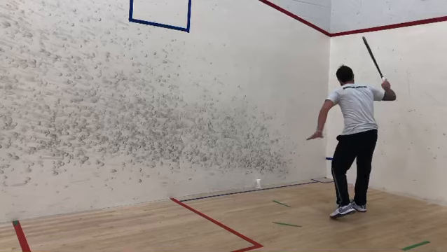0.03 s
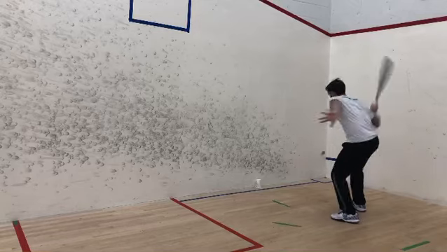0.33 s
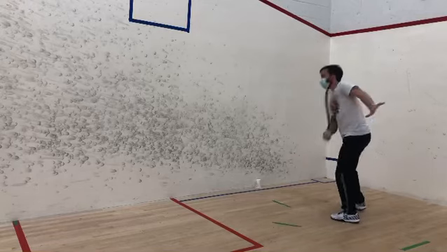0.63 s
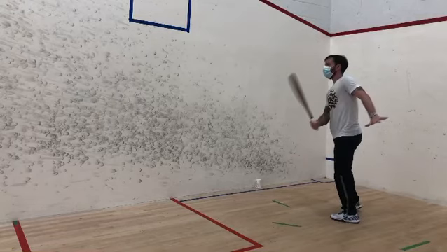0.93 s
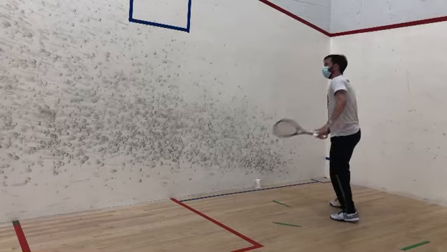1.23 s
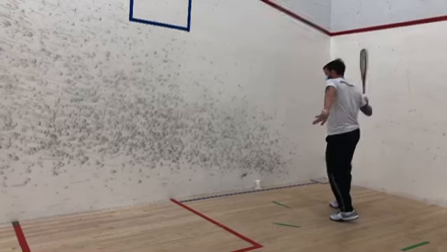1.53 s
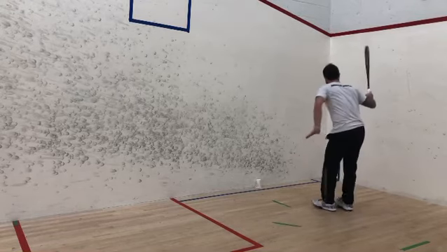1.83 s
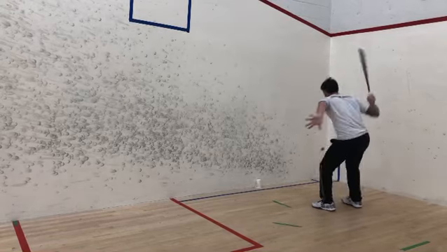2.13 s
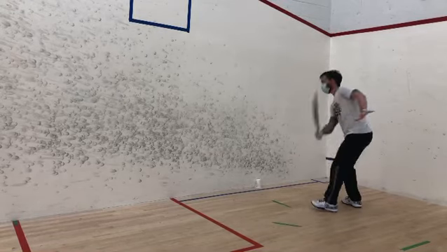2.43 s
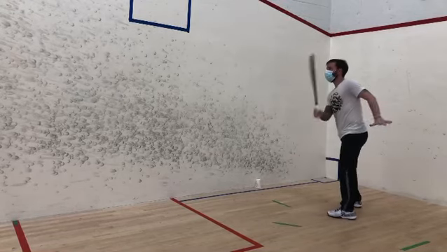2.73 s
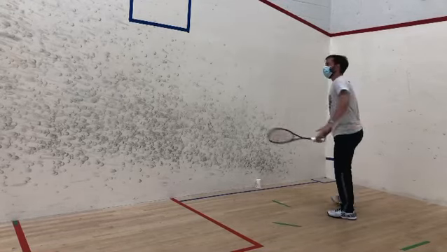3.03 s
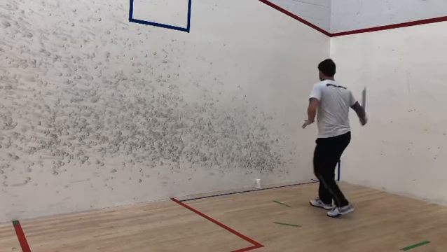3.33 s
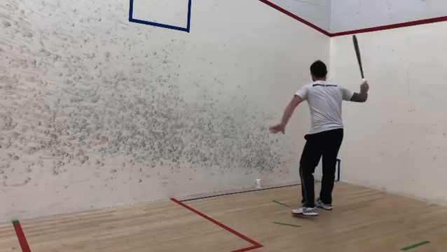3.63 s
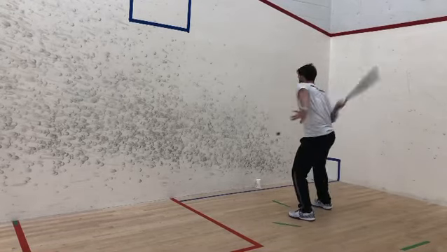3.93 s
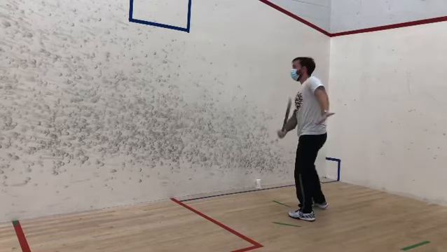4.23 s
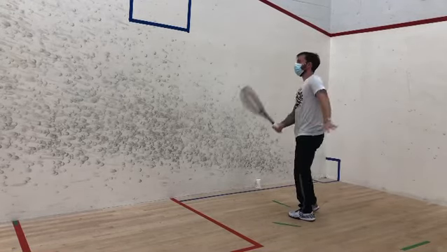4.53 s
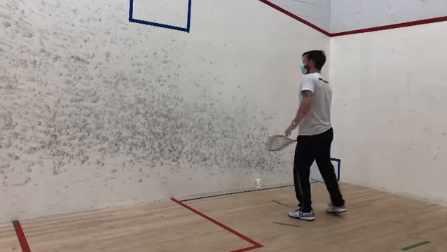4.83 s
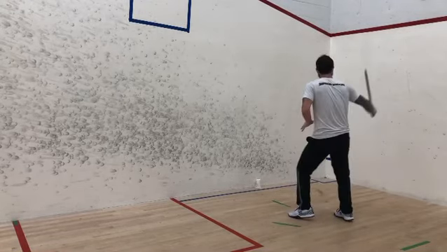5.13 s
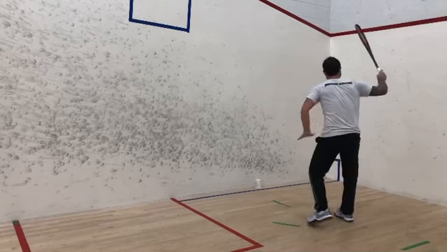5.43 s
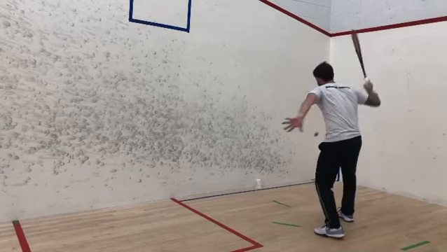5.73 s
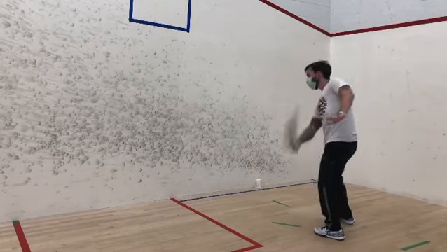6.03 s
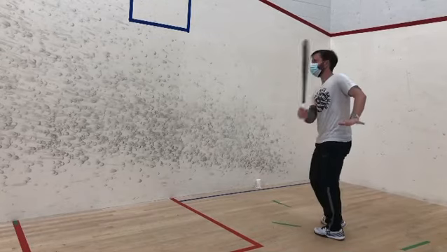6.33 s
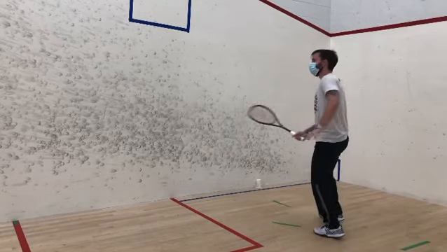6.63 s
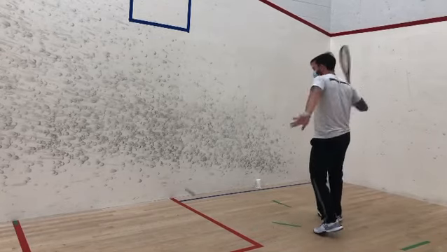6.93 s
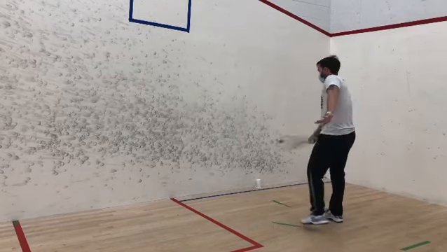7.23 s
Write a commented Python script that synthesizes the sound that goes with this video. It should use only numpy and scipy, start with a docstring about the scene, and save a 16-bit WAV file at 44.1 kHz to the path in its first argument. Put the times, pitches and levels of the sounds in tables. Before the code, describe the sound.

A lone player hits a squash ball five times at an even pace in a bare, reverberant court. Each stroke is a faint swish and a sharp, pinging crack. After the first four, the ball slaps the front wall loudly, then bounces softly on the wooden floor with a low boom. Light shoe scuffs fall between strokes over a ventilation murmur. The microphone picks up direct hits and long echoes.

```python
"""A shoe scuff and the last of a slap die away over murmuring ventilation in a bare, reverberant court.
Then a player strikes a squash ball five times: the racket swishes, its strings crack and ping. After each
of the first four strokes the hollow ball slaps the front wall loudly and bounces softly on the sprung
floor, which booms. Shoes scuff between strokes. Each impact of the ball is heard as direct sound, early
reflections and a diffuse field whose treble decays first."""
import sys
import numpy as np
from scipy import signal
from scipy.fft import rfft, irfft, next_fast_len
from scipy.io import wavfile
from scipy.ndimage import uniform_filter1d, minimum_filter1d

SR = 44100
rng = np.random.default_rng(int(sys.argv[2]) if len(sys.argv) > 2 else 0)


def generate_wav(signal):
    """Clip the signal to [-1, 1] and save it as 16-bit WAV at the path in sys.argv[1]."""
    frames = np.transpose(np.atleast_2d(signal))
    scaled = np.clip(frames, -1, 1) * 32767
    pcm = np.round(scaled).astype(np.int16)
    wavfile.write(sys.argv[1], SR, pcm)


N = 325458

# racket meets ball: (time [s], crack level [dB], ping level [dB], string bed mode [Hz], upper mode [Hz])
STROKES = [(0.3916, -8, -6, 1080, 1460), (2.2296, -8.5, -1, 1020, 1660), (3.9742, -12.5, 0, 1020, 1530),
           (5.8642, -10.5, -6, 1040, 1560), (7.1638, -10, 0, 980, 1750)]
# ball meets wall, the first before the scene opens: (time [s], level [dB], snap spacing [s])
SLAPS = [(-1.2, 2, .0013), (0.6129, 2.4, .0012), (2.4530, 2, .0014), (4.1948, 1.7, .0011),
         (6.0733, 2, .0014)]
# ball meets floor: (time [s], tick level [dB])
BOUNCES = [(1.391, -29.5), (3.3644, -31), (5.0675, -34), (6.8777, -32)]
# shoes on the boards: (time [s], scuff level [dB], scuff length [s], thud level [dB])
STEPS = [(-.07, -44, .03, -46), (1.724, -44.5, .03, -42), (1.775, -47.5, .006, -44),
         (1.842, -51, .008, -45), (3.4554, -46, .006, -39), (4.757, -51, .06, -62), (5.122, -55, .008, -41),
         (5.2458, -47, .006, -47)]
# normal modes: (frequency [Hz], relative level [dB], decay time T60 [s])
HARD_BALL_MODES = [(430, -11, .014), (810, -5, .016), (1850, -3, .006), (3100, -8, .0025),
                   (7300, -7, .0013)]   # the hollow rubber ball, driven hard
SOFT_BALL_MODES = [(760, 13, .02), (3100, 12, .008)]   # the same ball, gently bounced
BOARD_MODES = [(80, -1, .13), (115, 6, .14), (148, -5, .8), (200, 5, .14)]   # the sprung floor
# reverberation time of the court: (frequency [Hz], T60 [s])
COURT_T60 = [(100, 2.2), (260, 2.8), (700, 2.8), (1900, 2.6), (3000, 2.05), (4800, 1.36), (7000, .9),
             (9500, .66), (13000, .5)]
# spectra that the sources radiate into the court: (frequency [Hz], relative spectral density [dB])
VENT_SPECTRUM = [(20, -40), (30, -16), (44, 4), (54, -4), (80, 4), (115, -5), (170, -2), (293, -7),
                 (373, -4), (450, -11), (624, -11), (775, -6), (1200, -16), (2000, -18), (4400, -36),
                 (11600, -53), (16000, -65)]
SCUFF_SPECTRUM = [(200, -3), (1500, 0), (3200, 1), (5000, -4), (8000, -5), (13000, -9), (16000, -17)]
BOOM_SPECTRUM = [(40, -18), (75, -7), (110, -3), (160, 0), (205, -4), (270, -16), (600, -35), (3000, -70)]
TICK_SPECTRUM = [(200, -4), (800, 0), (2000, -2), (3100, -2), (4500, -8), (8000, -11), (12000, -17),
                 (16000, -27)]
SWISH_SPECTRUM = [(80, -6), (300, 0), (700, -7), (1500, -16), (4000, -21), (9000, -28), (16000, -40)]
RACKET_SPECTRUM = [(41, -24), (80, -5), (166, -6), (330, 2), (480, 0), (620, -9), (950, 1), (1230, -7),
                   (1550, -4), (2000, -13), (3100, -12), (4500, -18), (7700, -20), (12200, -29.5),
                   (16000, -52)]
SLAP_SPECTRUM = [(50, -30), (110, -19), (160, -12), (350, -3), (590, -6), (880, 1.5), (1040, -11),
                 (1220, -20), (1450, -8.5), (1950, -6), (2700, -14.5), (4500, -18.5), (8000, -17.5),
                 (12000, -24), (16000, -40)]

TAIL = np.arange(5 * SR // 2) / SR   # time axis of a reverberant tail [s]
BLOW = np.arange(SR // 20) / SR   # time axis of one impact [s]


def from_db(db):
    """Amplitude ratio of a level: tenfold for every 20 dB."""
    return 10 ** (np.asarray(db) / 20)


def unit_rms(x):
    """Normalisation to unit mean power."""
    return x / np.sqrt(np.mean(x ** 2) + 1e-20)


def at_hz(points, hz):
    """Interpolation of a table on a logarithmic frequency axis."""
    frequencies, values = np.transpose(points)
    return np.interp(np.log(np.maximum(hz, 1)), np.log(frequencies), values)


def decay(t, t60):
    """Exponential damping, 60 dB down at t60."""
    return np.exp(-np.log(1000) * t / t60)


def add(out, start_s, x):
    """Superposition: x adds to out from start_s on."""
    i = round(start_s * SR)
    lo, hi = max(i, 0), min(i + len(x), len(out))
    if hi > lo:
        out[lo:hi] += x[lo - i:hi - i]


def band_pass(x, low_hz, high_hz, order=2):
    """Butterworth filtering passes the band between two frequencies."""
    return signal.sosfilt(signal.butter(order, [low_hz, high_hz], "band", fs=SR, output="sos"), x)


def coloured(x, spectrum):
    """Spectral shaping by multiplication in the frequency domain."""
    size = next_fast_len(len(x) + SR // 20, real=True)
    grid_hz = np.geomspace(10, SR / 2, 300)
    bin_hz = np.arange(size // 2 + 1) * SR / size
    gain = np.interp(bin_hz, grid_hz, from_db(at_hz(spectrum, grid_hz)))
    return irfft(rfft(x, size) * gain, size)[:len(x)]


def noise(spectrum, size):
    """Gaussian noise of a given spectrum and unit rms."""
    return unit_rms(coloured(rng.standard_normal(size), spectrum))


def ring(t, hz, t60, contact_s):
    """A damped normal mode builds up during contact, then decays freely."""
    return np.sin(2 * np.pi * hz * t) * decay(t, t60) * (1 - np.exp(-(t / contact_s) ** 2))


def diffuse_fields(places=3, grain_db=3.5, grain_t60=.9):
    """Diffuse reflections, lumpy at first and then dense; air absorption removes the treble first."""
    edges_hz = np.r_[40, np.geomspace(180, 17000, 14)]
    white = rng.standard_normal((2, places, len(TAIL)))
    fields = 0
    for k, (low, high) in enumerate(zip(edges_hz, edges_hz[1:])):
        band = band_pass(white[k % 2], low, high, order=3)
        fields = fields + band * decay(TAIL, at_hz(COURT_T60, np.sqrt(low * high)))
    lumps = unit_rms(uniform_filter1d(rng.standard_normal((places, len(TAIL))), size=90))
    return fields * from_db(grain_db * lumps * decay(TAIL, grain_t60))


def reverberation(field, spectrum, build_s, gap_s=.009):
    """The reverberant field builds up after an initial time gap; unit rms over the first 0.2 s."""
    swell = 1 - np.exp(-np.maximum(TAIL - gap_s, 0) / build_s)
    tail = coloured(field, spectrum) * swell
    return tail / np.std(tail[:SR // 5])


def with_echoes(blow, echo_db, scatter_db=-23):
    """Direct sound, a weak near reflection and a wall's flutter echo, each echo smeared by scattering."""
    near_s, near_db = .013, -14
    wall_s, wall_db = .0246, -.5
    spacing_s, db_per_doubling = .011, -5   # the level falls each time the echo count doubles
    flutter = [(wall_s + k * spacing_s, wall_db + db_per_doubling * np.log2(k + 1)) for k in range(6)]
    paths = np.zeros(SR // 5)
    for delay_s, db in [(near_s, near_db)] + flutter:
        smear = from_db(scatter_db) * rng.standard_normal(len(BLOW)) * decay(BLOW, .007)
        smear[0] = 1   # the specular part
        add(paths, delay_s, from_db(db + echo_db) * smear / np.linalg.norm(smear))
    paths = band_pass(paths, 700, 13000)
    paths[0] = 1   # the direct path
    return signal.fftconvolve(blow, paths)


def ventilation(level_db=-41):
    """Stationary broadband noise, strongest in the bass, is heard as a murmur."""
    return from_db(level_db) * noise(VENT_SPECTRUM, N)


def footsteps(fields):
    """Friction of rubber soles on the boards makes a scuff; their impact makes a dull reverberant thud."""
    out, t = np.zeros(N), TAIL[:SR // 4]
    for k, (s, scuff_db, length_s, thud_db) in enumerate(STEPS):
        field = fields[k % len(fields)]
        pressure = 2 * t / length_s * np.exp(1 - 2 * t / length_s)
        add(out, s, from_db(scuff_db) * noise(SCUFF_SPECTRUM, len(t)) * pressure)
        add(out, s, from_db(scuff_db - 7.5) * reverberation(field, SCUFF_SPECTRUM, build_s=length_s))
        add(out, s, from_db(thud_db) * reverberation(field, BOOM_SPECTRUM, build_s=.02))
    return out


def floor_bounces(fields, boards_db=-26.5, boom_db=-33):
    """Impact excitation: the ball ticks and pops on the wood, and the hollow floor's low modes boom."""
    out, t = np.zeros(N), TAIL[:SR // 2]
    for k, (s, tick_db) in enumerate(BOUNCES):
        field = fields[k % len(fields)]
        tick = noise(TICK_SPECTRUM, len(BLOW)) * decay(BLOW, .025)
        pop = sum(from_db(db) * ring(BLOW, hz * rng.normal(1, .06), t60, contact_s=.0015)
                  for hz, db, t60 in SOFT_BALL_MODES)
        boards = sum(from_db(db) * ring(t, hz * rng.normal(1, .03), t60, contact_s=.014)
                     for hz, db, t60 in BOARD_MODES)
        boom = reverberation(field, BOOM_SPECTRUM, build_s=.015) * decay(TAIL, 2.5)
        add(out, s, from_db(tick_db) * with_echoes(tick + pop, echo_db=-8))
        add(out, s, from_db(tick_db - 16.5) * reverberation(field, TICK_SPECTRUM, build_s=.01))
        add(out, s + .002, from_db(boards_db) * boards)   # the bending wave takes a moment to spread
        add(out, s, from_db(boom_db) * boom)
    return out


def racket_strokes(fields, swish_s=.09, dwell_s=.0035):
    """Airflow swishes through the frame; impact excites strings and frame; the squeezed ball pops free."""
    out = np.zeros(N)
    until_hit = np.arange(round(swish_s * SR), 0, -1) / SR
    for k, (s, crack_db, ping_db, bed_hz, upper_hz) in enumerate(STROKES):
        field = fields[k % len(fields)]
        swish = noise(SWISH_SPECTRUM, len(until_hit)) * decay(until_hit, .16)
        add(out, s - swish_s, from_db(-29) * swish)
        crack_envelope = decay(BLOW, .032) * (1 - np.exp(-BLOW / .0005))
        crack = from_db(crack_db) * noise(TICK_SPECTRUM, len(BLOW)) * crack_envelope
        bed_mode = ring(BLOW, bed_hz, t60=.026, contact_s=.002)
        upper_mode = from_db(-4.5) * ring(BLOW, upper_hz, t60=.03, contact_s=.002)
        strings = from_db(ping_db) * (bed_mode + upper_mode)
        frame = from_db(crack_db - 2) * ring(BLOW, hz=3050, t60=.016, contact_s=.001)
        pop = ring(BLOW, 400, .034, .001) + from_db(-1) * ring(BLOW, 680, .014, .001)
        blow = crack + strings + frame
        add(blow, dwell_s, from_db(crack_db + 3.5) * pop)
        add(out, s, with_echoes(blow, echo_db=-17))
        room_db = -17.7 + .36 * crack_db   # the reverberation follows the crack's level only in part
        add(out, s, from_db(room_db) * reverberation(field, RACKET_SPECTRUM, build_s=.003))
        lingering_ping = signal.fftconvolve(strings, field / np.linalg.norm(field))
        add(out, s, from_db(-9.3) * lingering_ping)
    return out


def wall_slaps(fields, pitch_sag=.12, snap_step_db=-1.5, room_db=-16.95):
    """Elastic rebound: the ball flattens and springs back in three snaps, each lower and weaker."""
    out = np.zeros(N)
    for k, (s, slap_db, spacing_s) in enumerate(SLAPS):
        field = fields[(k + 1) % len(fields)]
        slap = np.zeros(len(BLOW))
        for snap in range(3):
            pitch = np.exp(-pitch_sag * (snap - 1))
            modes = sum(from_db(db) * np.sin(2 * np.pi * hz * pitch * BLOW) * decay(BLOW, t60)
                        for hz, db, t60 in HARD_BALL_MODES)
            hiss = band_pass(rng.standard_normal(len(BLOW)), 2000, 10000)
            click = from_db(3) * hiss * decay(BLOW, .0016)
            add(slap, snap * spacing_s, from_db(slap_db + snap * snap_step_db) * (modes + click))
        add(out, s, with_echoes(band_pass(slap, 400, 13000), echo_db=-6))
        add(out, s, from_db(slap_db + room_db) * reverberation(field, SLAP_SPECTRUM, build_s=.009))
    return out


def scene():
    """The pressures of all sources in the court superpose in one channel."""
    fields = diffuse_fields()
    murmur = ventilation()
    rally = racket_strokes(fields) + wall_slaps(fields) + floor_bounces(fields)
    return (murmur + rally + footsteps(fields))[None]


def record(dry, ceiling=.86):
    """Fast peak limiting holds down the hardest blows; the sound fades in quickly and is band-limited."""
    fade_in = np.clip((np.arange(N) / SR - .033) / .006, 0, 1)
    allowed_gain = ceiling / np.maximum(np.abs(dry), ceiling)
    gain = uniform_filter1d(minimum_filter1d(allowed_gain, size=21), size=21)
    bass_cut = signal.butter(4, 33, "high", fs=SR, output="sos")
    treble_cut = signal.ellip(10, .1, 80, 16000, fs=SR, output="sos")
    return signal.sosfilt(treble_cut, signal.sosfilt(bass_cut, dry * gain * fade_in))


dry = scene()
out = record(dry)
generate_wav(out)
```